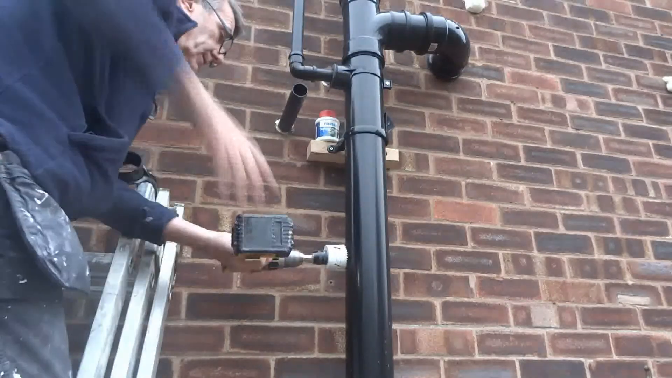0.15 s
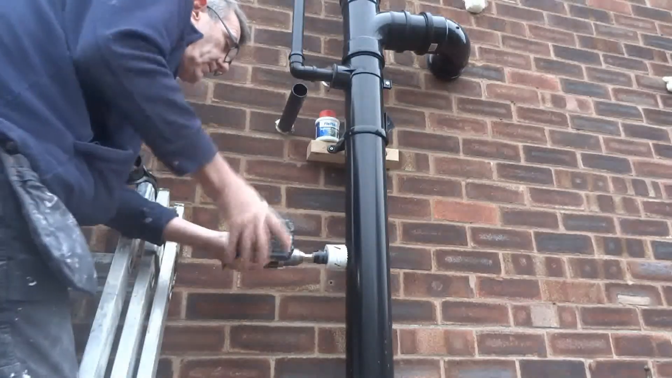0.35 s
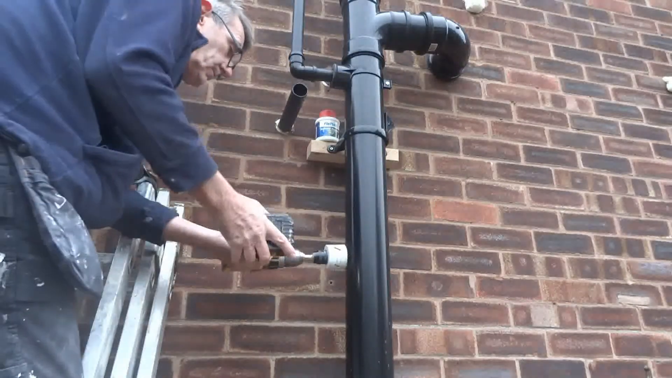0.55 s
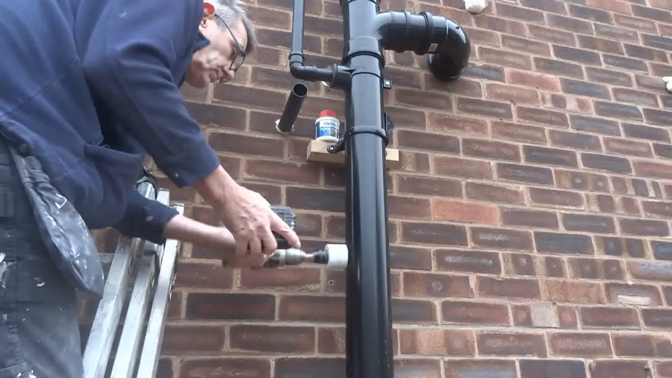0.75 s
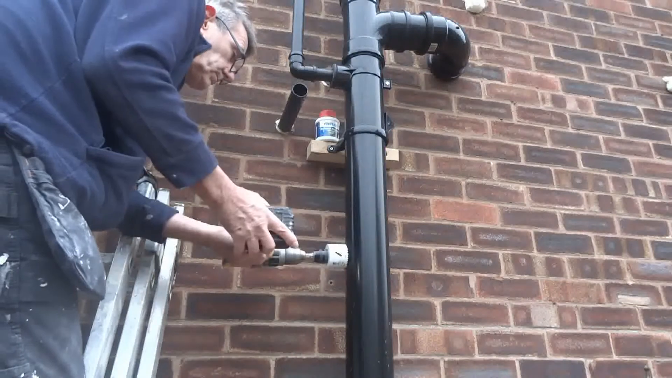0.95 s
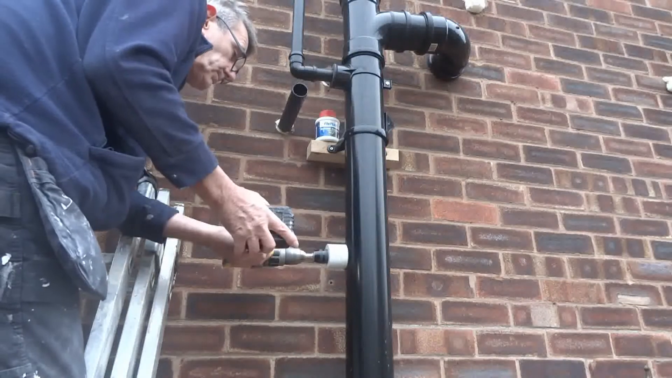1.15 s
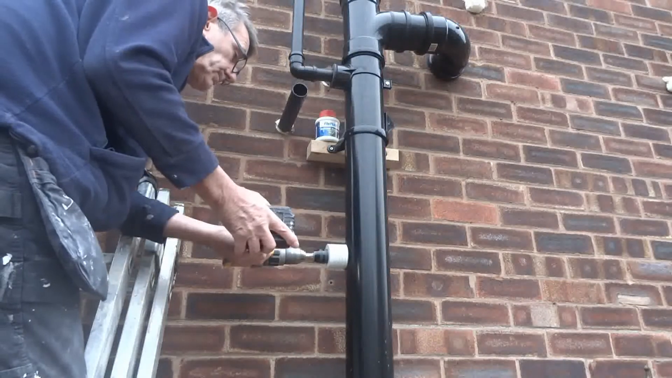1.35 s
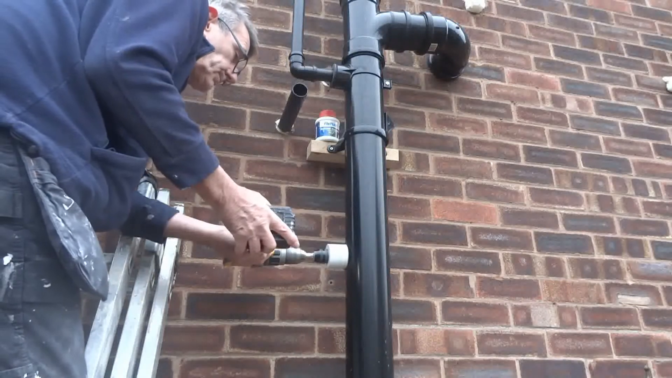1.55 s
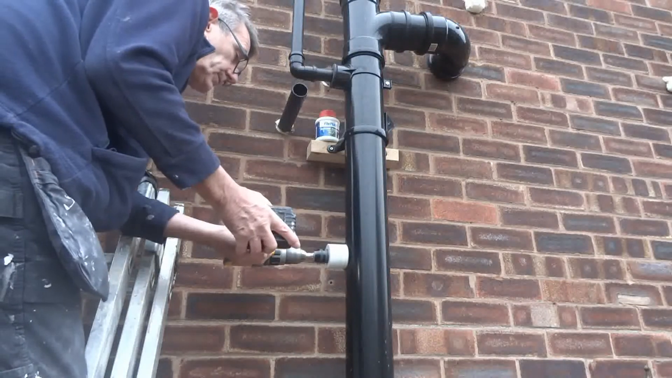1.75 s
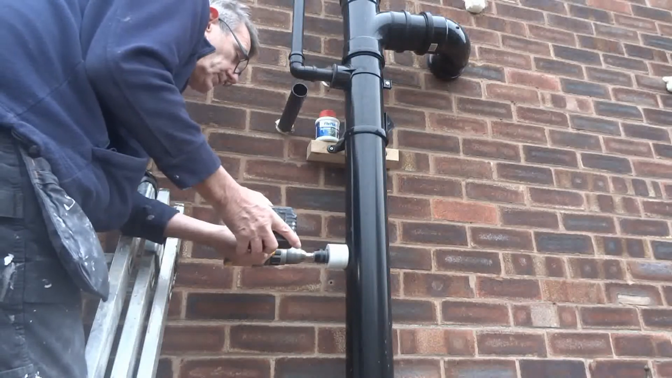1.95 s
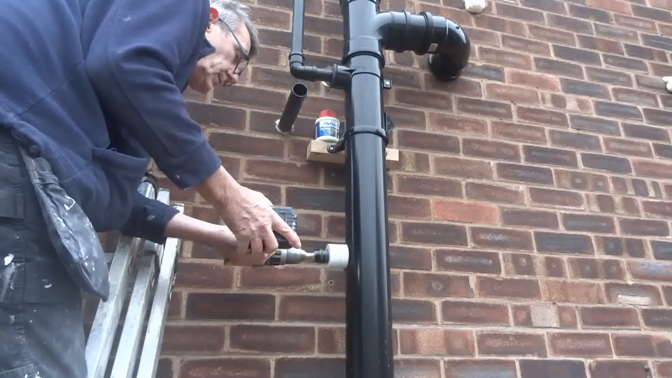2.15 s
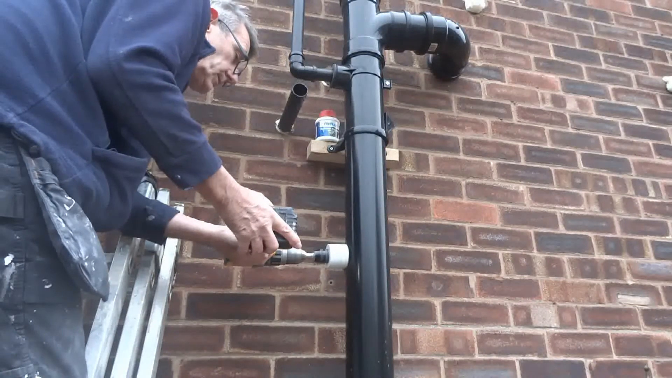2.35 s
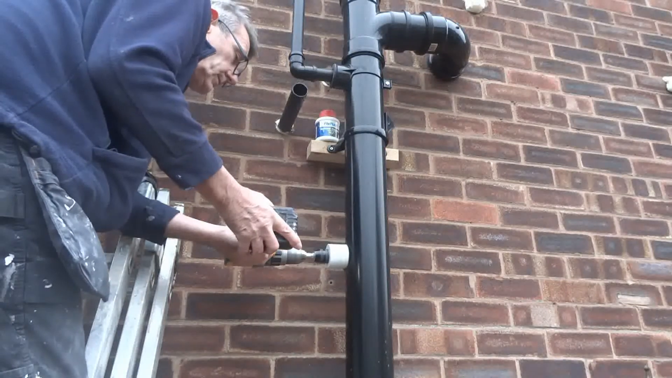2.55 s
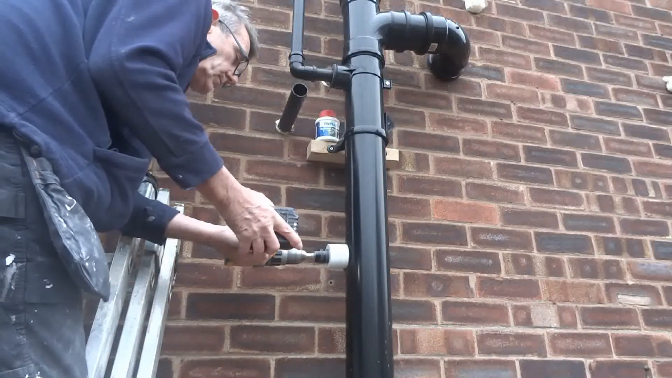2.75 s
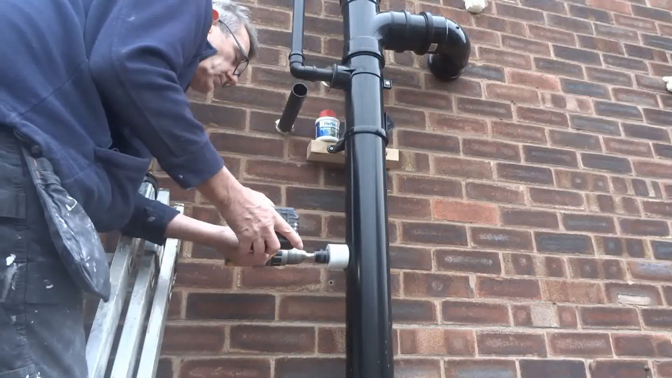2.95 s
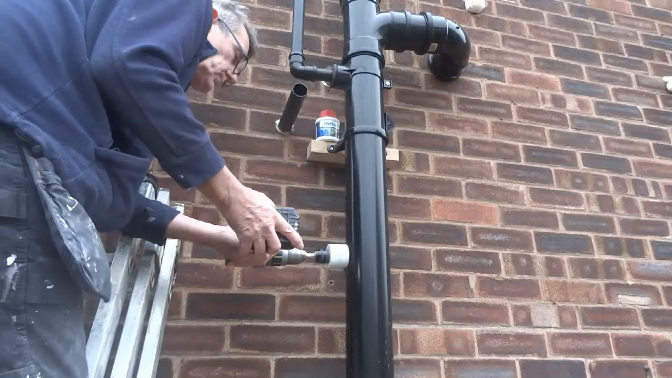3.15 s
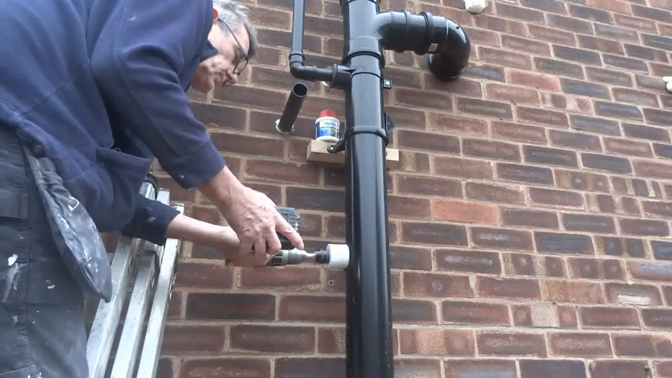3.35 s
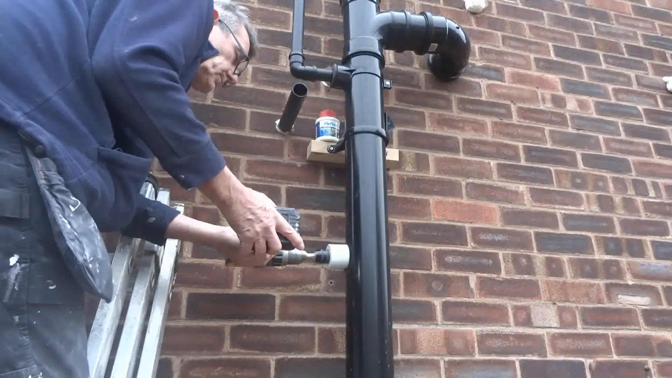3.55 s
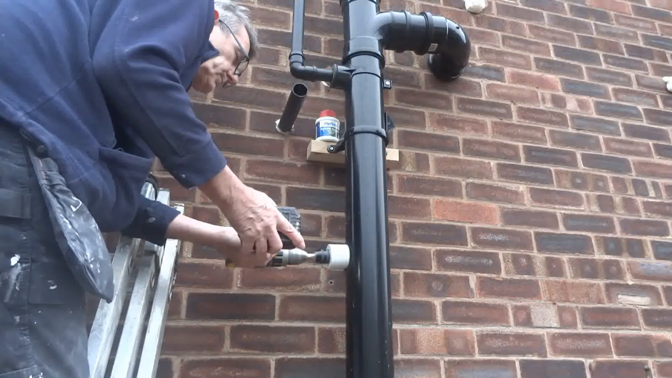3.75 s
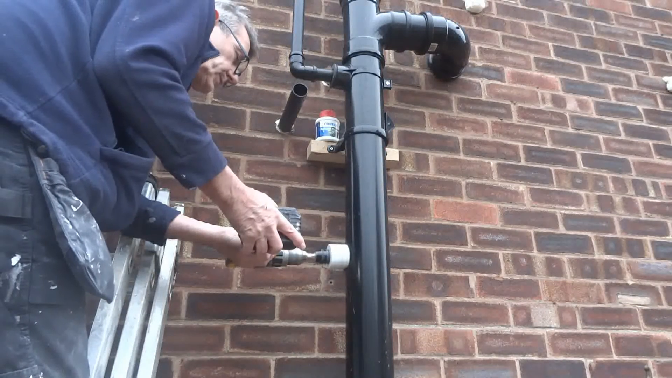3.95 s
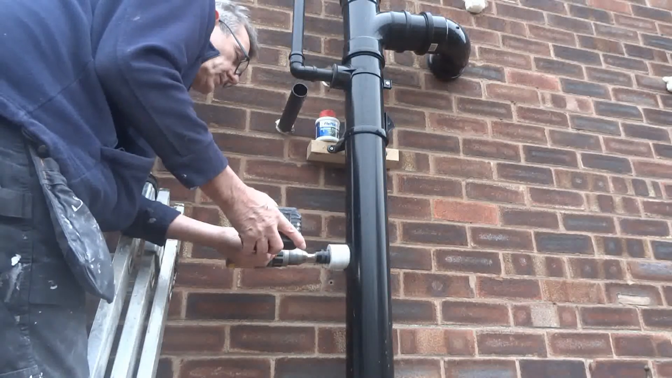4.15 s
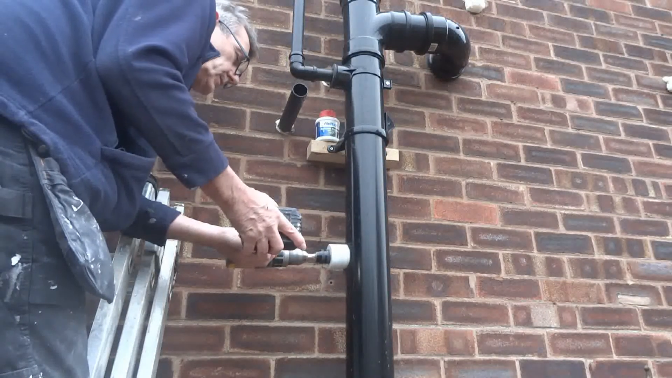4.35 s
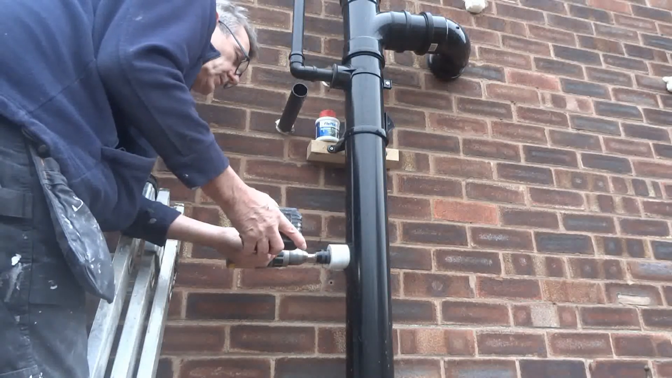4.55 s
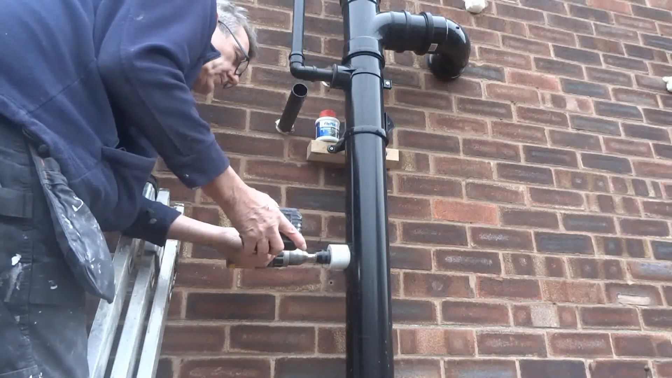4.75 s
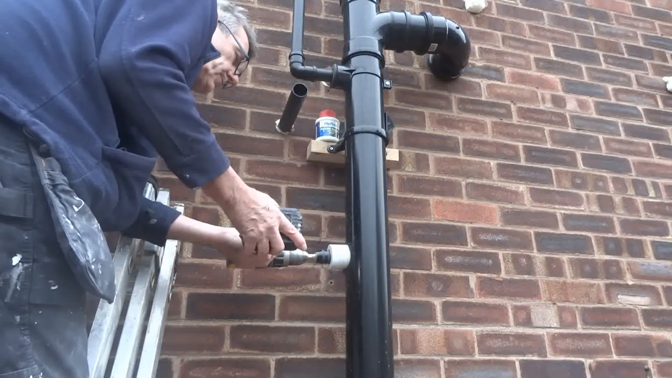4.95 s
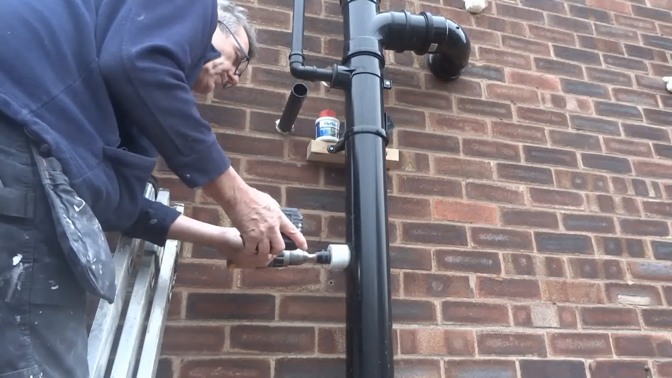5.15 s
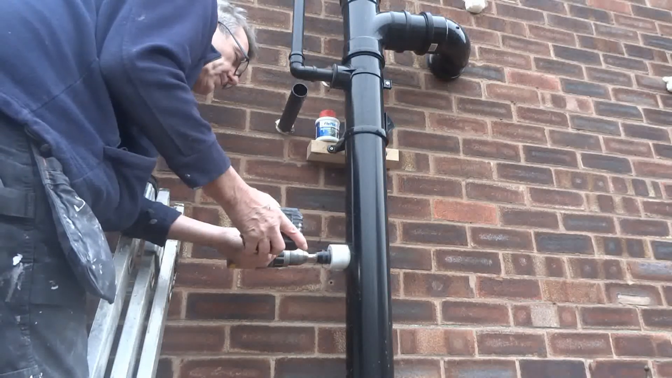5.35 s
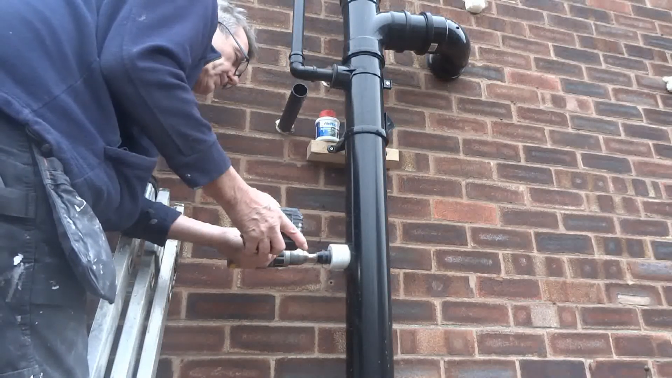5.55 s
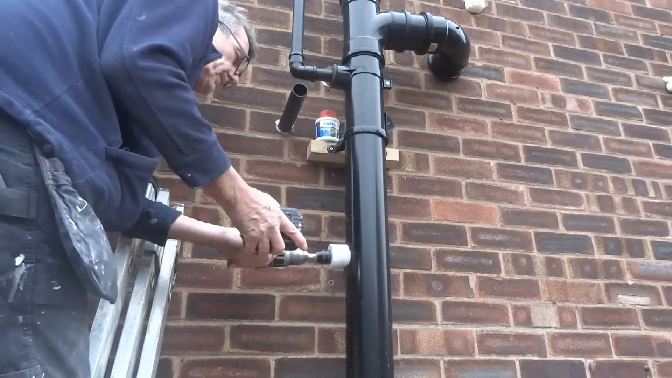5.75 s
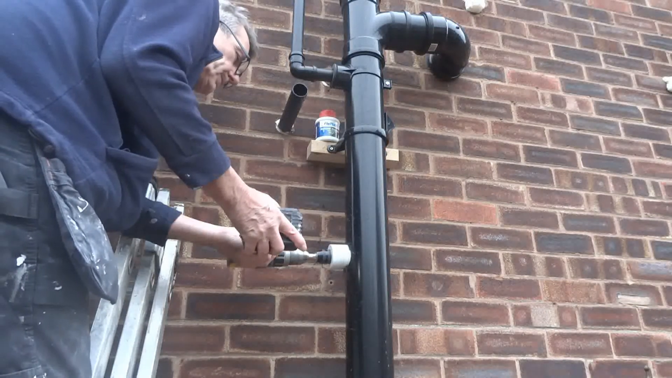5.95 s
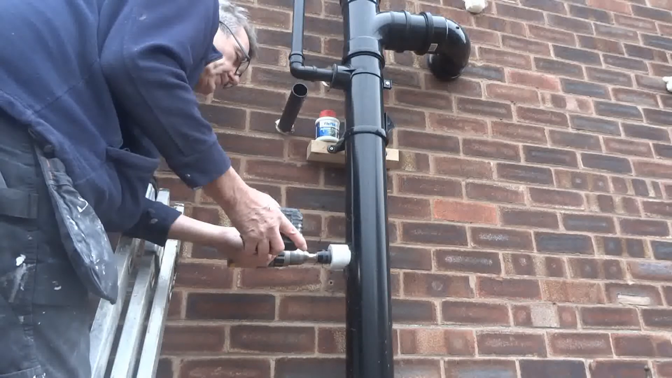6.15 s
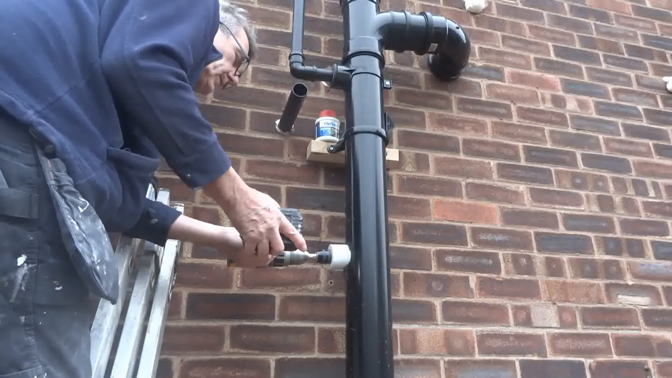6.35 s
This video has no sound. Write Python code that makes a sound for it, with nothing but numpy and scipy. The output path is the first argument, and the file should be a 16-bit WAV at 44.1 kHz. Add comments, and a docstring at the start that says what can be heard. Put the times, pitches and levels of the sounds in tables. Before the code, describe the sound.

Quiet open air with a faint two-note bird whistle at 0-0.25 s, then small grip clicks and soft thuds from 0.26 to 0.42. At about 0.46 a cordless drill starts, whirring up unevenly; sharp tooth cracks cluster at 0.6-0.71, with clatter, low pipe rumble and a thin high squeal near 0.73. From 0.9 it drops almost to a stop, leaving a short hollow hum. It creeps from 1.04, climbs through a half-speed rattle at 1.1-1.35, then surges, briefly overshooting, with a squeak and thud around 1.38. From 1.45 to the end at about 6.4, full speed holds: a steady shrill whine around 3.3 kHz, dense bright rasp and fluttering plastic rumble. Hollow knocks come at 1.55, in a regular run at 1.97-2.4, at 3.16 and 3.6-3.8. After 3.6-4.8 the groove deepens: tone more wavering, higher gear whine stronger, pipe resonance fuller. Close, dry, slightly wide; no final stop.

```python
"""Out in the quiet open air a grip clicks and thuds, then a cordless drill runs in a short burst.
It slows almost to a stop, creeps, then cuts at full speed: a hole saw in a plastic drainpipe.
Motor and gears whine as sine tones tied to the shaft speed. Streams of tiny noise snaps ring
the steel saw as a rasp and the pipe wall as a rumble; fading sine tones make the pipe's knocks."""
import sys
import numpy as np
from scipy import signal
from scipy.fft import rfft, irfft, next_fast_len
from scipy.io import wavfile
from scipy.ndimage import uniform_filter1d

SR = 44100
rng = np.random.default_rng(int(sys.argv[2]) if len(sys.argv) > 2 else 0)


def unload_wav(signal):
    """Save mono or channel-first audio to the path in sys.argv[1] as 16-bit WAV at rate SR, clipped to [-1, 1]."""
    wavfile.write(
        sys.argv[1],
        SR,
        np.round(np.clip(np.atleast_2d(signal).T, -1, 1) * 32767).astype(np.int16),
    )


N = 283122
T = np.arange(N) / SR
FULL_HZ = 409.8  # motor turns per second at full speed

# Resonances of the saw and drill. Each row: frequency in Hz, width in Hz, lift in dB.
SAW_RESONANCES = [(2892, 186, 3), (2980, 165, 4), (3920, 290, 2.5), (4710, 230, 2), (5610, 180, 2.5),
                  (6390, 100, 5), (6640, 140, 5), (6800, 180, 2.5), (7210, 240, 1), (7840, 640, 3.5),
                  (7900, 130, -4), (8960, 150, 4), (9700, 200, -2), (10290, 330, 4), (10860, 250, 0.5),
                  (11430, 450, 2.5)]


def amp(db):
    """Turns decibels into a gain."""
    return 10 ** (np.asarray(db) / 20)


def evened(x):
    """Scales a sound to an average (rms) level of one."""
    return x / np.sqrt(np.mean(x ** 2) + 1e-20)


def curves(rows):
    """Joins the rows by straight lines over time: one signal for each column after the first."""
    s, *columns = np.transpose(rows)
    return [np.interp(T, s, column) for column in columns]


def during(rows):
    """Is one while the table lasts and zero elsewhere, with soft edges."""
    inside = 1. * (T >= rows[0][0]) * (T <= rows[-1][0])
    return uniform_filter1d(inside, size=400)


def read(points, hz):
    """Reads a spectrum between its points, on a logarithmic frequency axis."""
    f, value = np.transpose(points)
    return np.interp(np.log(hz + 1), np.log(f + 1), value)


def add(mix, s, sound):
    """Mixes a sound in, starting at s seconds."""
    part = mix[round(s * SR):][:len(sound)]
    part += sound[:len(part)]


def swell(s, rise_s, fall_s):
    """An envelope that grows to one at time s and dies away."""
    return np.exp(-np.maximum((s - T) / rise_s, (T - s) / fall_s))


def wander(rate_hz):
    """Smooth random drift with an rms of one, changing up to about the given rate."""
    count = N // 16  # one point every 16 samples is enough for slow drift
    hz = np.fft.rfftfreq(count, 16 / SR)
    slow = irfft(rfft(rng.standard_normal(count)) * np.exp(-(hz / rate_hz) ** 2))
    return evened(np.interp(T, np.linspace(0, T[-1], len(slow)), slow))


def colour(x, spectrum, modes=()):
    """Rings x through a body that only responds after it is struck: a broad spectrum plus resonances."""
    hz = abs(np.fft.fftfreq(8192, 1 / SR))
    lifts = sum(lift / (1 + (2 * (hz - f) / width) ** 2) for f, width, lift in modes)
    db = read(spectrum, hz) + lifts
    # minimum phase puts the response after the blow
    response = np.fft.ifft(np.exp(signal.hilbert(np.log(amp(db))).conj())).real
    return evened(signal.oaconvolve(x, response[:len(hz) // 2])[:len(x)])


def chips(per_s, spread_db, smooth):
    """Tiny snaps of uneven size over a smooth scrape."""
    size = amp(spread_db * np.minimum(rng.exponential(1, N), 4)) * rng.choice([-1, 1], N)
    snaps = evened(size * (rng.random(N) < per_s / SR))
    return snaps + smooth * rng.standard_normal(N)


def bursts(per_s, decay_s):
    """Power of many small tears, each starting at once and dying away, with an average of one."""
    starts = rng.exponential(1, N) * (rng.random(N) < per_s / SR)
    power = signal.lfilter([1], [1, -np.exp(-1 / (SR * decay_s))], starts)
    return power / power.mean()


def shaft_speed():
    """The motor chases the trigger with some inertia, and can only speed up so fast."""
    # The trigger: creep, burst, near stop, creep, half speed, overshoot, full speed.
    # Each row: start in seconds, asked motor turns per second.
    asked_rows = [(.462, 62), (.56, 80), (.611, 288), (.727, 360), (.843, 306), (.902, 19), (1.038, 55),
                  (1.104, 212.5), (1.355, 470), (1.436, 409.7)]
    inertia_s, spin_up_hz_per_s = .021, 2600
    step_s = 1 / 2000
    ticks, speeds = np.arange(0, T[-1], step_s), [0]
    asked = np.zeros(len(ticks))
    for s, hz in asked_rows:
        asked[ticks >= s] = hz
    for hz in asked[1:]:
        change = min((hz - speeds[-1]) / inertia_s, spin_up_hz_per_s)
        speeds.append(speeds[-1] + step_s * change)
    return np.interp(T, ticks, speeds)


def bite(saw_turns, drift_hz, slope, count):
    """Uneven teeth: a pattern of load that repeats each turn and slowly wears into another."""
    angle = 2 * np.pi * saw_turns
    load = 0
    for k in range(1, count + 1):
        wave = wander(drift_hz) * np.cos(k * angle) + wander(drift_hz) * np.sin(k * angle)
        load = load + wave / k ** slope
    return evened(load)


def loudness(law, pace, depth):
    """Gain of a layer of the cut, from the share of full speed, the push and the groove's depth."""
    # How hard the saw is pressed on the pipe. Each row: time in seconds, push in dB.
    push_rows = [(.55, -16), (.6, 17), (.652, -3), (.68, 8.5), (.79, 8), (.9, -0.5), (1.05, -2.5),
                 (1.22, 7), (1.3, -2), (1.9, -1.5), (2.5, 1), (3.4, -0.5), (4.2, 1.5), (6.4, 0)]
    db, power, per_push, deep_db = law
    push_db = curves(push_rows)[0]
    return amp(db + per_push * push_db + deep_db * depth) * pace ** power


def motor(pace, load, depth):
    """Tones at multiples of the shaft speed; each bite sags it, and it judders more in a deep groove."""
    # Each row: multiple of the shaft speed, level in dB relative to the whole whine.
    shaft_orders = [(1, -24), (3, -18.5), (4, -20.5), (7, -27), (8, -0.5), (9, -21), (12, -19), (16, -17.5),
                    (28, -27)]
    whine_start_db, fade_db_per_s, flutter_db = -21.3, -.68, 0.87
    # The main whine and the gear mesh sing out above this speed and are fainter below it.
    singing_order, sing_hz, sing_width_hz, slow_db = 8, 323, 13, -21
    # The gear mesh gains level in the deep groove, and for a moment near first full speed.
    mesh_order, mesh_db, deep_db = 23, -11.5, 6.5
    fresh_s, fresh_db, fresh_rise_s, settle_s = 1.4, 7.5, 0.92, 0.18

    speed_hz = FULL_HZ * pace
    sag = (0.0024 + 0.00043 * depth) * load
    judder = (0.001066 + 0.002225 * depth) * wander(34.8)
    angle = 2 * np.pi * np.cumsum(speed_hz * (1 - (sag + judder))) / SR
    sing = amp(slow_db * (.5 - .5 * np.tanh((speed_hz - sing_hz) / sing_width_hz)))

    whine = 0
    for k, db in shaft_orders:
        order = round(k)
        tone = np.sin(order * angle + rng.uniform(0, 2 * np.pi))
        whine = whine + amp(db) * (sing if order == singing_order else 1) * tone
    whine = whine * (1 + (0.15 + 0.16 * depth) * wander(110))

    mesh_gain = amp(mesh_db + deep_db * depth + fresh_db * swell(fresh_s, fresh_rise_s, settle_s))
    # play between the gear teeth blurs the mesh tone
    mesh_tone = np.sin(mesh_order * angle + 0.66 * wander(50))
    mesh = sing * mesh_gain * mesh_tone * (1 + 0.2 * wander(120))
    whine_db = whine_start_db + fade_db_per_s * T + flutter_db * wander(13.0)
    return np.sqrt(2) * amp(whine_db) * pace * (whine + mesh)


def rasp(pace, load, depth):
    """Chips snap off the teeth and ring the steel cup and gearbox; the finest ones fizz."""
    # Broad colour of the rasp. Each row: frequency in Hz, level in dB.
    rasp_spectrum = [(900, -37.5), (1700, -12), (2300, -1.5), (2800, 0.5), (3500, 1.5), (4300, 0),
                     (5200, -2.5), (6200, -5), (7000, -2), (9700, -3), (12300, -1), (13000, -6.5)]
    # One row: dB at full speed, power of the speed, dB per dB of push, dB gained in the deep groove.
    rasp_levels = (-17, 1.27, 0.12, 0.16)
    fizz_spectrum = [(2000, -28), (5000, -10.5), (8000, -0.5), (12000, -0.5)]  # Hz, dB
    tears = np.sqrt(3 + bursts(per_s=440, decay_s=0.017))
    drive = chips(per_s=5000, spread_db=-0.5, smooth=0.83) * amp(.5 * load) * tears
    fizz = rng.standard_normal(N) * np.sqrt(bursts(per_s=170, decay_s=0.0023))
    sound = colour(drive, rasp_spectrum, SAW_RESONANCES)
    sound = sound + amp(-9.0) * colour(fizz, fizz_spectrum, SAW_RESONANCES)
    # below full speed the teeth land in separate scrapes
    slow = np.interp(pace, [.75, .98], [1, 0])
    scrapes = np.sqrt(1 + .33 * slow * (bursts(per_s=200, decay_s=.004) - 1))
    return loudness(rasp_levels, pace, depth) * scrapes * evened(sound)


def pipe(pace, load, depth):
    """The teeth shake the pipe wall, whose resonances shift as the groove deepens."""
    # Broad colours: rumble on the uncut wall, in a shallow and in a deep groove, and chatter.
    # Each row: frequency in Hz, level in dB.
    uncut_spectrum = [(25, -36), (60, -29), (120, -18.5), (190, -9), (260, -1.5), (340, 3), (420, 2.5),
                      (520, -0.5), (700, 0.5), (900, -4), (1200, -16), (2200, -34)]
    shallow_spectrum = [(25, -42), (60, -43), (110, -18.5), (170, -18.5), (215, -5.5), (260, -7.5),
                        (330, 3.5), (420, -0.5), (520, 2.5), (750, -3.5), (1100, -8.5), (2200, -47.5)]
    deep_spectrum = [(25, -35), (60, -36), (120, -16), (230, -13.5), (290, -0.5), (400, 8), (520, 0.5),
                     (750, 1), (1100, -13), (2200, -33)]
    chatter_spectrum = [(400, -25.5), (750, -10.5), (1000, -0.5), (1500, 0.5), (2000, -2.5), (2500, -17),
                        (4000, -26.5)]
    # Wall resonances, shallow then deep groove. Each row: frequency in Hz, width in Hz, lift in dB.
    shallow_modes = [(135, 31, 12), (207, 37, 7), (299, 16, 2.5), (360, 40, 5.5), (620, 45, 2),
                     (700, 19, 6), (766, 32, 6), (930, 130, 4), (1126, 49, 4.5), (1193, 130, 4),
                     (1384, 76, 7), (1610, 70, 5.5), (1860, 21, 11), (2064, 85, 9.5)]
    deep_modes = [(217, 44, 10.2), (291.5, 6.1, 5.9), (367, 16, 2.6), (399, 18, 2.5), (494, 23, 2.6),
                  (633, 75, 3.7), (764, 45, 6.1), (910, 46, 7.7), (1082, 34, 3.4), (1190, 95, 4.9),
                  (1440, 110, 4), (1670, 46, 4.1), (1867, 29, 8.1), (1980, 87, 4.3)]
    uncut_modes = [(129, 23, 7.3), (264, 25, 3.3), (507, 45, 3.5)]
    # One row: dB at full speed, power of the speed, dB per dB of push, dB gained in the deep groove.
    rumble_levels = (-31.5, 0.92, 1.05, -1.9)
    chatter_levels = (-28.5, 1.07, 0.16, -1.74)

    grip = np.tanh(0.28 * load)  # the teeth can only bite so deep
    drive = chips(per_s=2200, spread_db=2, smooth=0.51) * amp((7.5 - 0.91 * depth) * grip)
    rumble = (1 - depth) * colour(drive, shallow_spectrum, shallow_modes)
    rumble = rumble + depth * colour(drive, deep_spectrum, deep_modes)
    # in the first burst the teeth skate over the uncut wall
    rumble = np.where(T < 1, colour(drive, uncut_spectrum, uncut_modes), rumble)

    drive = chips(per_s=2500, spread_db=1.5, smooth=0.72) * amp(1.2 * grip)
    chatter = (1 - depth) * colour(drive, chatter_spectrum, shallow_modes)
    chatter = chatter + depth * colour(drive, chatter_spectrum, deep_modes)
    rumble_gain = loudness(rumble_levels, pace, depth)
    return rumble_gain * rumble + loudness(chatter_levels, pace, depth) * chatter


def rattle(pace):
    """Slack gear teeth ring the gearbox: most at half speed, and in a clatter when the speed jumps."""
    # Gearbox resonances. Each row: frequency in Hz, width in Hz, lift in dB.
    gearbox_modes = [(3070, 460, 13), (3590, 260, 11.5), (7200, 600, 11), (10400, 370, 8.4),
                     (11000, 250, 6)]
    # Clatters. Each row: peak time in seconds, level in dB.
    clatter_rows = [(0.653, -19.5), (.9, -24), (1.14, -28), (1.388, -20.5)]
    gearbox_spectrum = [(1200, -27), (2400, 5.5), (4000, 5), (5500, 1.5), (12000, -20)]  # Hz, dB
    drive = chips(per_s=1800, spread_db=1.2, smooth=.6)
    slack = np.maximum(1 - (2 * pace - 1) ** 2, 0) ** 1.1
    clatter = sum(amp(db) * swell(s, rise_s=0.02, fall_s=0.0087) for s, db in clatter_rows)
    level = amp(-35.5) * slack + clatter
    return level * colour(drive, gearbox_spectrum, gearbox_modes)


def catches():
    """A snagged tooth lets go and the pipe knocks, ringing freely in several fading tones."""
    # Snags. Each row: start in seconds, peak level in dB before a shared trim.
    snag_rows = [(0.593, -23), (0.673, -17), (0.706, -29), (0.775, -17), (0.899, -24), (1.34, -16.5),
                 (1.548, -14.5), (1.967, -16.5), (2.072, -15.5), (2.177, -15.5), (2.286, -15), (2.394, -16),
                 (2.5, -29), (3.158, -15), (3.581, -23), (3.741, -20), (3.793, -16.5)]
    # Ringing pipe. Each row: frequency in Hz, relative level in dB, seconds to fade by 60 dB.
    ring_modes = [(207, -21, 0.15), (294, -15.5, 0.13), (346, 2, 0.058), (376, -0.5, 0.069),
                  (444, -6, 0.13), (608, -2, 0.079)]
    trim_db = -5.5
    t, out = np.arange(SR // 2) / SR, np.zeros(N)
    for s, db in snag_rows:
        ring = 0
        for hz, level_db, t60 in ring_modes:
            tone = np.sin(2 * np.pi * hz * t + rng.uniform(-0.8, 1))
            ring = ring + amp(level_db - 60 * t / t60) * tone
        ring = ring * (1 - np.exp(-t / 0.0026))  # soft start
        add(out, s, amp(db + trim_db) * ring / abs(ring).max())
    return out


def clicks():
    """Grip and trigger click, then saw teeth strike as they land: noise cracks ring the saw and drill."""
    # Each row: start in seconds, level in dB before a shared trim, seconds to fade by 60 dB.
    click_rows = [(.274, -44, 0.042), (.295, -49, 0.05), (0.418, -45, .04), (.48, -30, .022),
                  (.499, -21.5, 0.025), (.579, -35, 0.018), (.596, -20, 0.024), (0.659, -11, 0.019),
                  (0.674, -17, .02), (0.693, -13, .02), (0.712, -15, .018), (1.109, -23.5, 0.031),
                  (1.325, -19, 0.023)]
    trim_db = 6.5
    body_spectrum = [(100, -17), (600, -7), (2500, 5.0), (6000, 3.5), (12000, 6.0)]  # Hz, dB
    t, out = np.arange(SR // 5) / SR, np.zeros(N)
    for s, db, t60 in click_rows:
        crack = rng.standard_normal(len(t)) * amp(-60 * t / t60) * (1 - np.exp(-t / .0007))
        ring = colour(crack, body_spectrum, SAW_RESONANCES)
        add(out, s, amp(db + trim_db) * crack.std() * ring)
    return out


def squeals():
    """Brief unsteady notes: the steel saw near 10.3 kHz, the gearbox and chuck near 3 to 3.6 kHz."""
    # Each row: peak time in seconds, frequency in Hz, level in dB, fall time in seconds.
    squeal_rows = [(.727, 10320, -15.5, 0.018), (.8, 10370, -32, .03), (.858, 10340, -25, .015),
                   (.878, 3055, -29, .025), (1.384, 3600, -16.5, 0.01)]
    out = np.zeros(N)
    for s, hz, db, fall_s in squeal_rows:
        tone = np.sin(2 * np.pi * hz * T + 0.87 * wander(130))
        out += amp(db) * swell(s, 0.0064, fall_s) * tone
    return np.sqrt(2) * out


def hollow(depth):
    """The air in the pipe hums on as the first burst ends, and again as the groove gets deep."""
    # Air column. Each row: frequency in Hz, relative level in dB, seconds to fade by 60 dB.
    column_modes = [(136, 2, 0.22), (258, -5, .5), (293, -6, 0.8), (337, -13, .8), (384, -1, .35),
                    (479, -11, .5)]
    t, out = np.arange(SR) / SR, np.zeros(N)
    ring = 0
    for hz, db, t60 in column_modes:
        tone = np.sin(2 * np.pi * hz * t + rng.uniform(0, 2 * np.pi))
        ring = ring + amp(db - 60 * t / t60) * tone
    add(out, .885, amp(-33.0) * ring * (1 - np.exp(-t / .012)))
    # the later hum holds the third tone of the column, wavering in strength and phase
    angle = 2 * np.pi * column_modes[2][0] * T
    hum = wander(5) * np.cos(angle) + wander(3.9) * np.sin(angle)
    return out + amp(-42) * depth * hum


def bumps():
    """Dull thuds of the tool and the ladder: low noise that swells and fades as the weight shifts."""
    # Each row: peak time in seconds, level in dB, fall time in seconds.
    bump_rows = [(.26, -57, .04), (0.417, -53, 0.035), (.69, -55, 0.066), (.91, -49, 0.039),
                 (1.365, -41, 0.027), (2.53, -44, 0.16), (4.22, -52, .06), (5.5, -50, 0.18),
                 (6.4, -53, .04)]
    thud_spectrum = [(20, -28), (50, -11), (85, -4), (120, 0), (190, -20), (500, -55)]  # Hz, dB
    level = sum(amp(db) * swell(s, 0.65 * fall_s, fall_s) for s, db, fall_s in bump_rows)
    return level * colour(rng.standard_normal(N), thud_spectrum)


def whistle(rows, blur):
    """A gliding tone with an unsteady phase."""
    hz, db = curves(rows)
    tone = np.sin(2 * np.pi * np.cumsum(hz) / SR + blur * wander(130))
    return np.sqrt(2) * amp(db) * during(rows) * tone


def bird():
    """A far bird whistles two gliding notes."""
    # One list for each note. Each row: time in seconds, frequency in Hz, level in dB.
    notes = [
        [(0, 3440, -64), (.04, 3500, -63), (.1, 3460, -62), (.17, 3440, -61), (.25, 3380, -72)],
        [(.18, 4300, -72), (.195, 4800, -59), (.208, 6360, -62), (.235, 6450, -75)],
    ]
    return sum(whistle(note, blur=1.3) for note in notes)


def air():
    """The open air: a steady bed of coloured noise."""
    # Each row: frequency in Hz, relative level in dB per Hz.
    air_spectrum = [(15, -33), (25, -31), (55, -20), (83, -10), (129, -33), (253, -8), (415, -11),
                    (597, -5), (953, -9), (1480, -22.5), (2130, -21.5), (3410, -21), (4090, -25),
                    (5440, -25), (12500, -24.5), (16200, -59), (22000, -120)]
    return amp(-52) * colour(rng.standard_normal(N), air_spectrum)


def outdoors(x):
    """Scatter from the wall and ground spreads the sound a little between left and right."""
    # Each row: frequency in Hz, left minus right in dB.
    balance_points = [(60, 2), (110, 0.5), (200, 0), (360, -0.5), (660, 0.0), (1200, 0), (2180, 0.5),
                      (3275, 1.5), (3960, 1.5), (7210, 0.5), (13100, 0.0)]
    # Each row: frequency in Hz, side minus mid in dB before a trim.
    side_points = [(60, -6), (110, -18), (200, -17), (360, -9), (660, -5), (1200, -10), (2180, -13),
                   (3960, -13), (7210, -22), (13100, -15)]
    side_trim_db = -1.0
    t = np.arange(SR // 8) / SR
    taps = rng.standard_normal(len(t)) * amp(-60 * t / 0.017) * (t > .001)
    size = next_fast_len(N + len(t))
    hz, mid = np.fft.rfftfreq(size, 1 / SR), rfft(x, size)
    scatter = rfft(taps / np.linalg.norm(taps), size)
    side = mid * scatter * amp(read(side_points, hz) + side_trim_db)
    lean = amp(read(balance_points, hz) / 2)  # half the difference goes to each ear
    return irfft(np.array([mid * lean + side, mid / lean - side]), size)[:, :N]


def scene():
    """The motor speed turns the saw; speed, bite and groove depth shape the layers of the cut."""
    # How far the saw has sunk into its groove. Each row: time in seconds, share from 0 to 1.
    groove_rows = [(3.6, 0), (4.8, 1)]
    gear_ratio = 43.3  # motor turns for one turn of the saw
    speed_hz = shaft_speed()
    depth = curves(groove_rows)[0]
    pace = speed_hz / FULL_HZ
    saw_turns = np.cumsum(speed_hz) / SR / gear_ratio
    load = bite(saw_turns, drift_hz=0.39, slope=0.42, count=10)
    tool = motor(pace, load, depth) + rasp(pace, load, depth) + rattle(pace) + clicks() + squeals()
    drainpipe = pipe(pace, load, depth) + catches() + hollow(depth)
    return outdoors(tool + drainpipe + bumps() + bird() + air())


def record(dry):
    """The input stage rounds off the tallest peaks; then a steep filter removes the top treble."""
    rounded = dry / (1 + (dry / .72) ** 6) ** (1 / 6)
    edge_hz = 12500
    low_pass = signal.firwin(601, edge_hz, window=("kaiser", 8), fs=SR)
    return signal.oaconvolve(rounded, low_pass[None], "same")


dry = scene()
out = record(dry)
unload_wav(out)
```